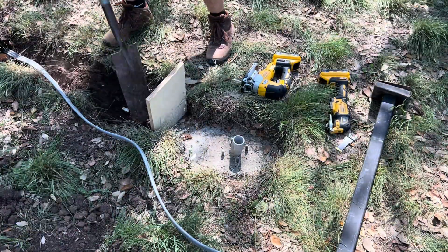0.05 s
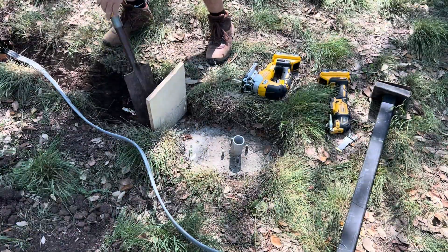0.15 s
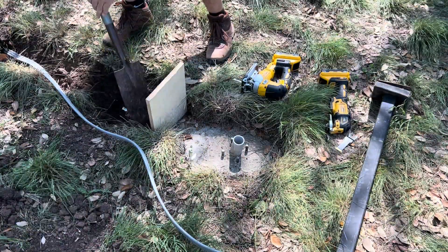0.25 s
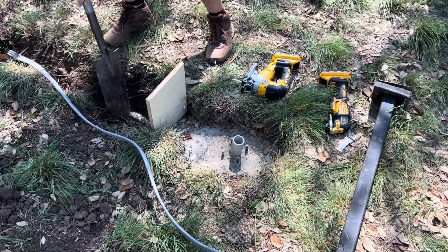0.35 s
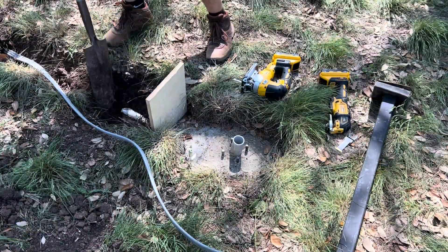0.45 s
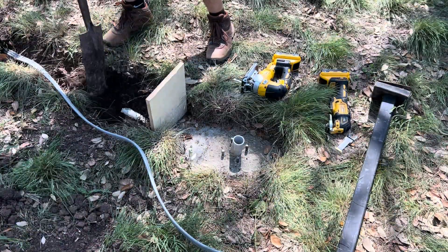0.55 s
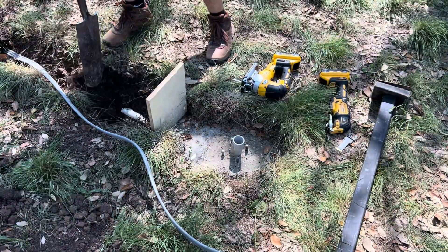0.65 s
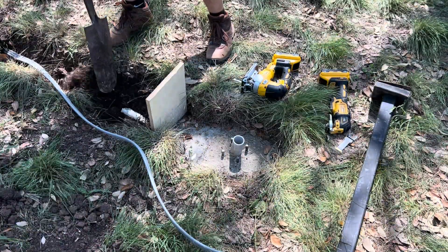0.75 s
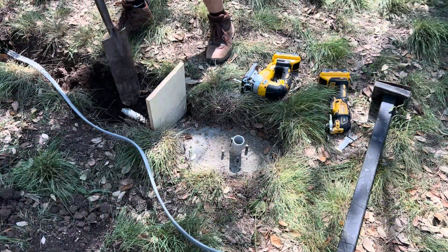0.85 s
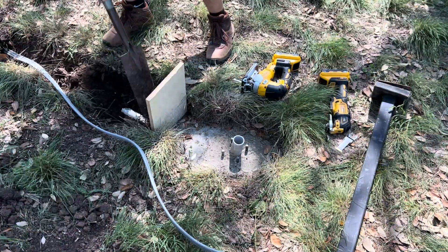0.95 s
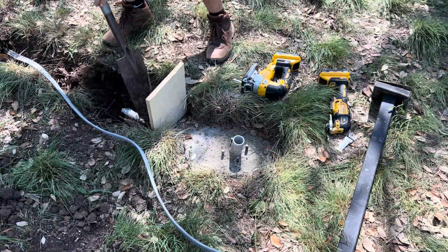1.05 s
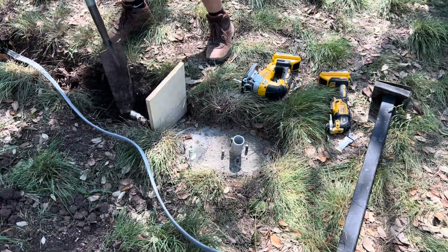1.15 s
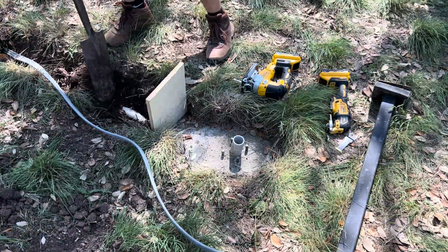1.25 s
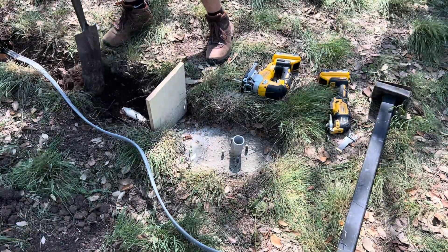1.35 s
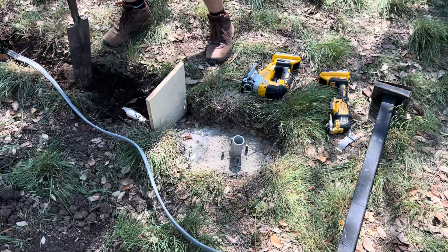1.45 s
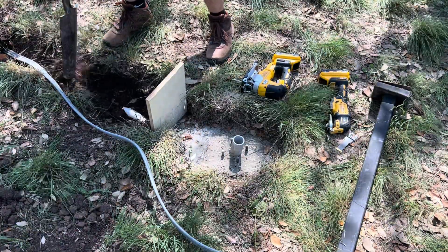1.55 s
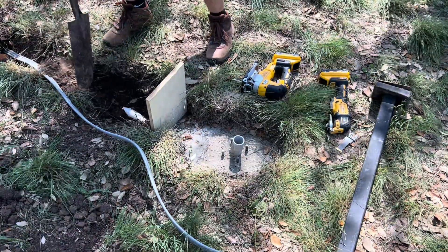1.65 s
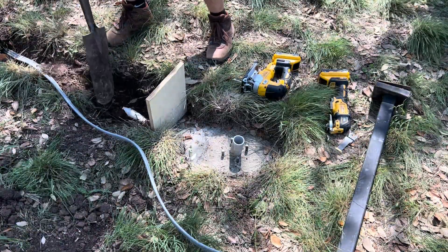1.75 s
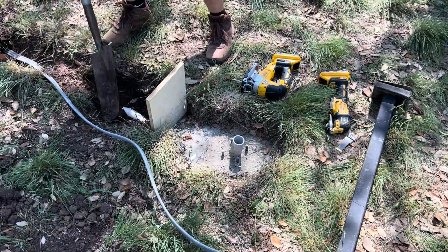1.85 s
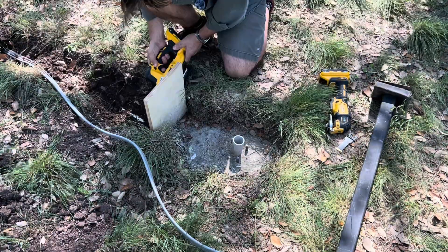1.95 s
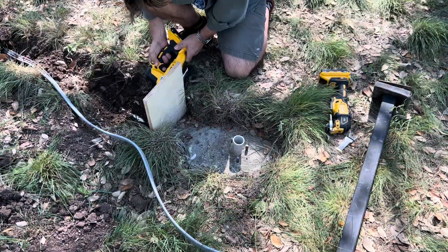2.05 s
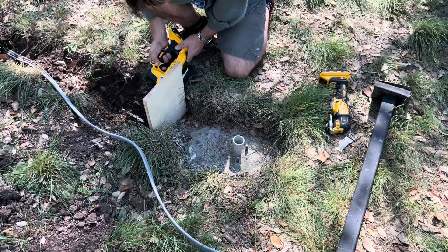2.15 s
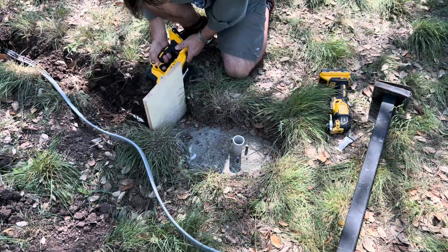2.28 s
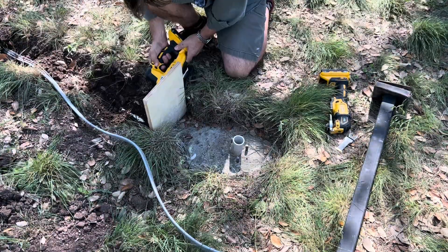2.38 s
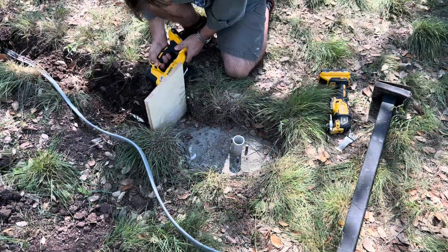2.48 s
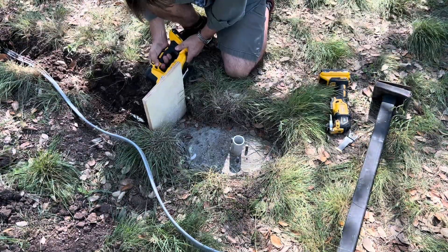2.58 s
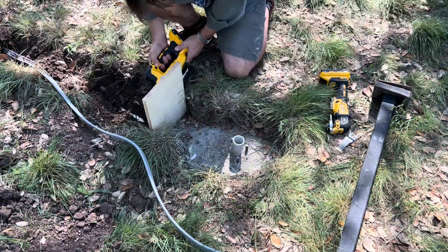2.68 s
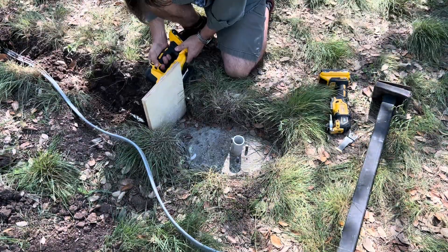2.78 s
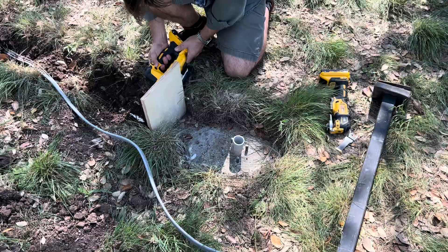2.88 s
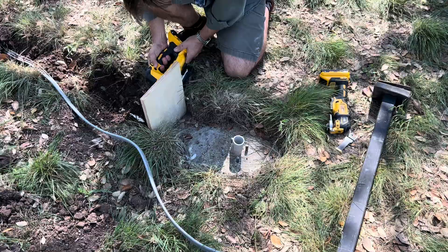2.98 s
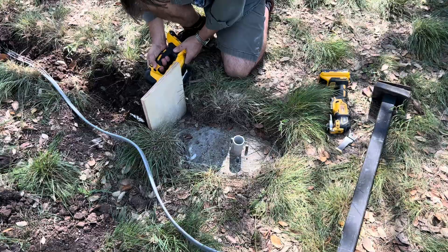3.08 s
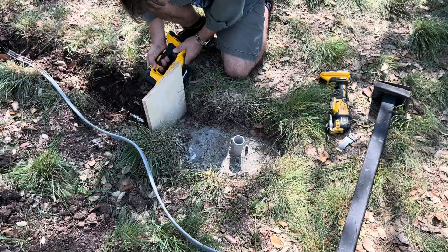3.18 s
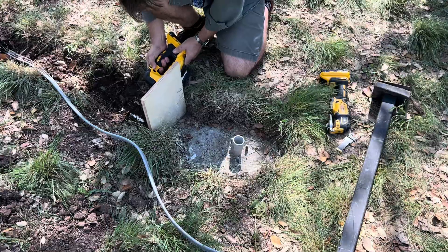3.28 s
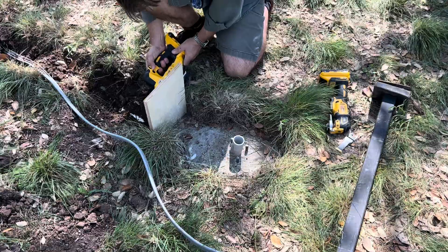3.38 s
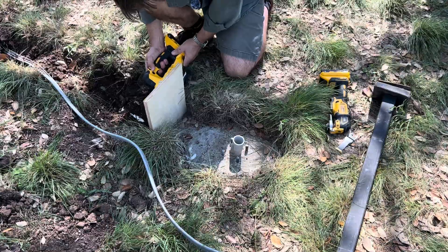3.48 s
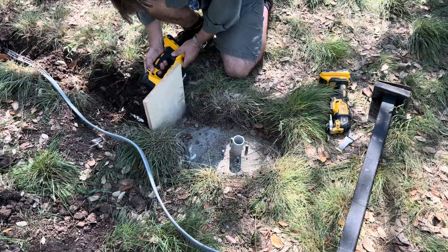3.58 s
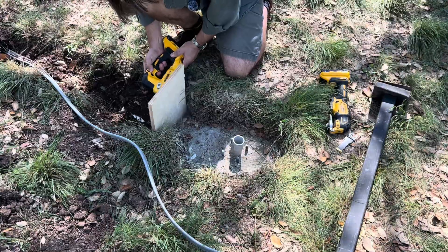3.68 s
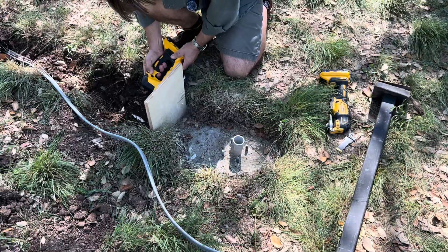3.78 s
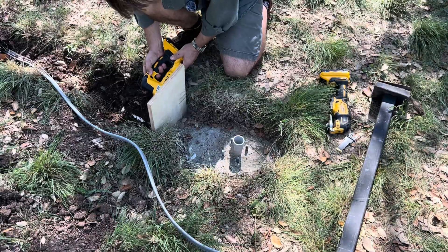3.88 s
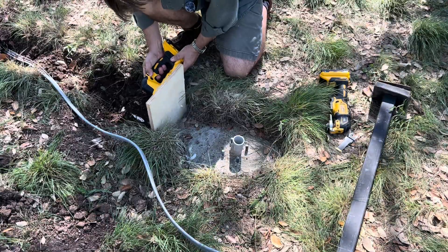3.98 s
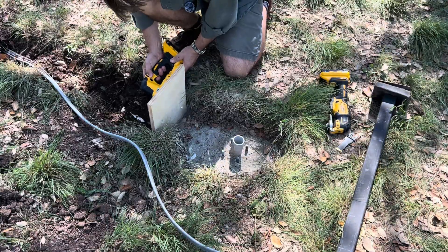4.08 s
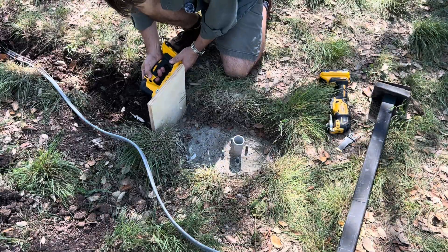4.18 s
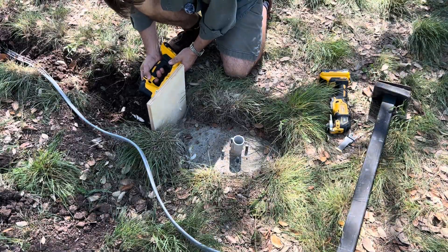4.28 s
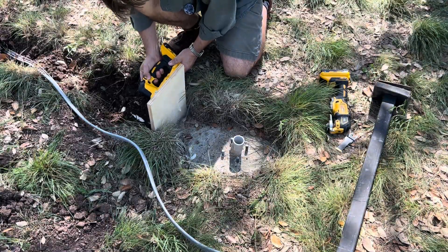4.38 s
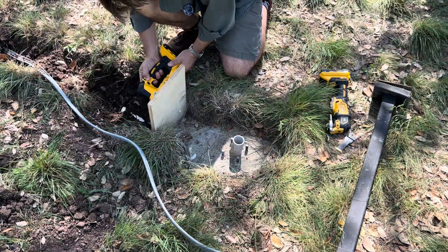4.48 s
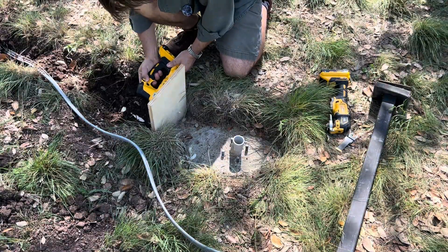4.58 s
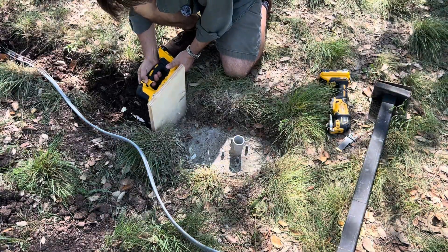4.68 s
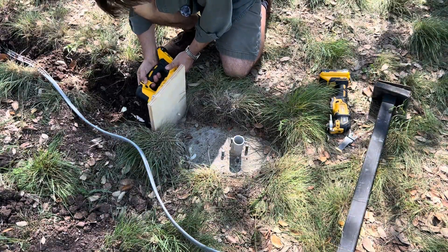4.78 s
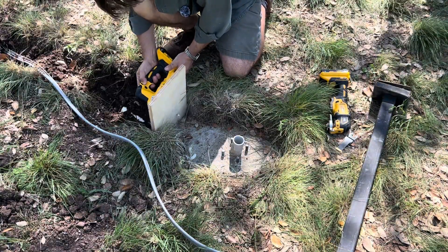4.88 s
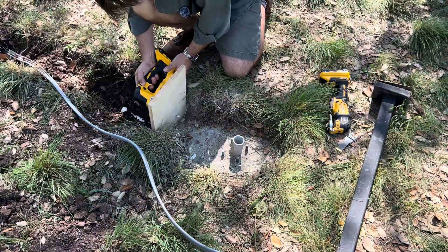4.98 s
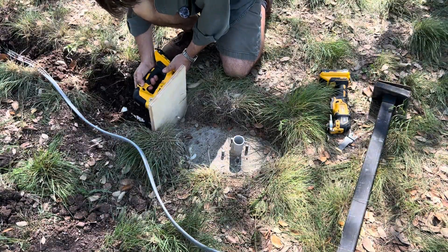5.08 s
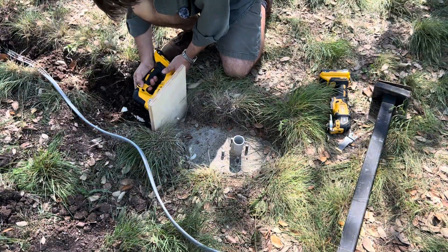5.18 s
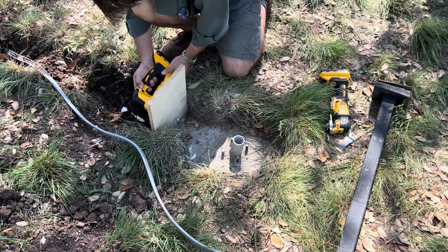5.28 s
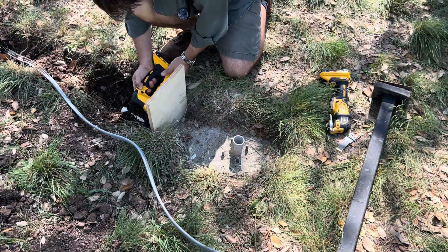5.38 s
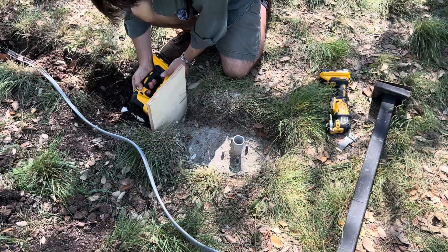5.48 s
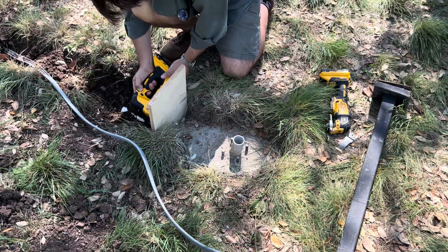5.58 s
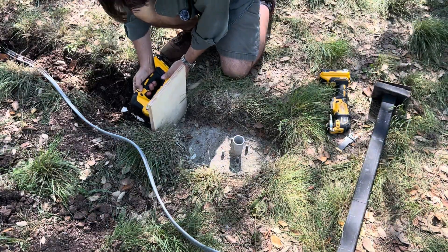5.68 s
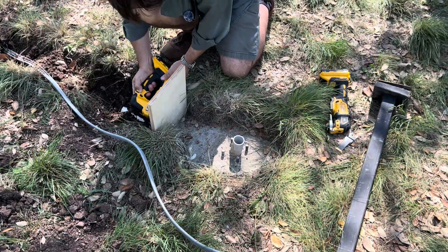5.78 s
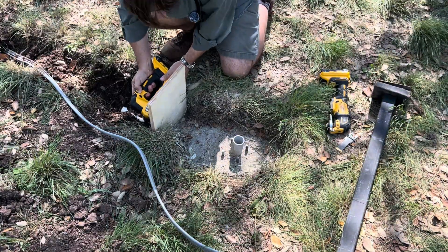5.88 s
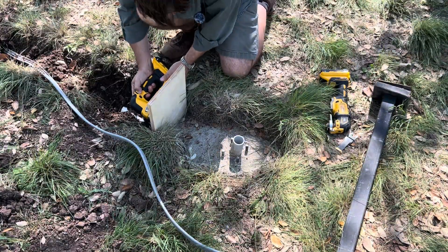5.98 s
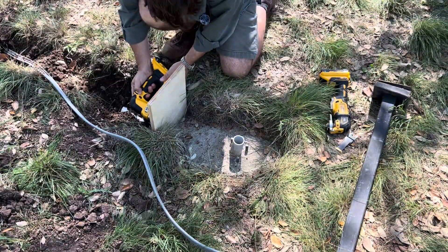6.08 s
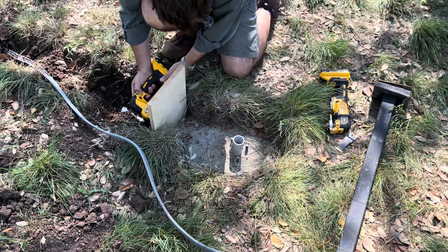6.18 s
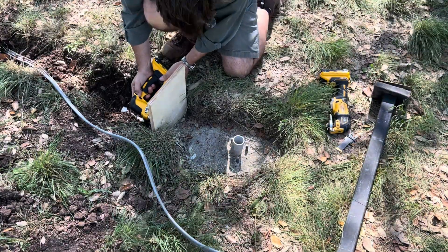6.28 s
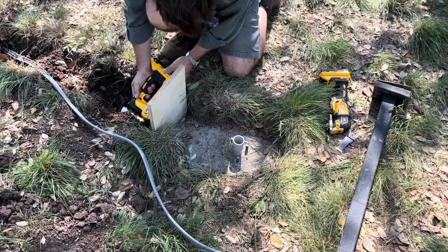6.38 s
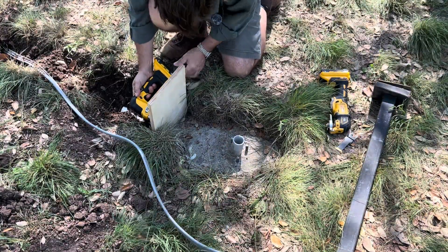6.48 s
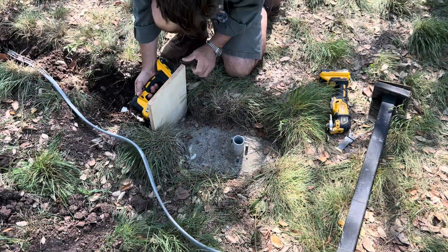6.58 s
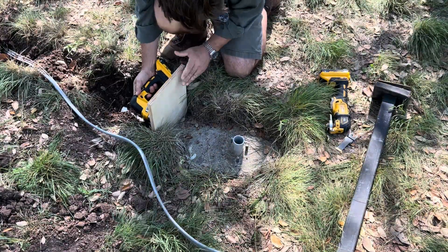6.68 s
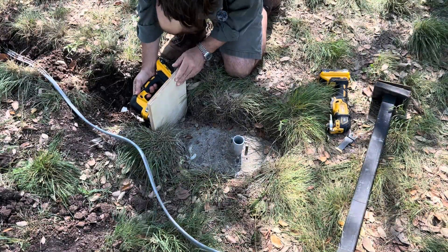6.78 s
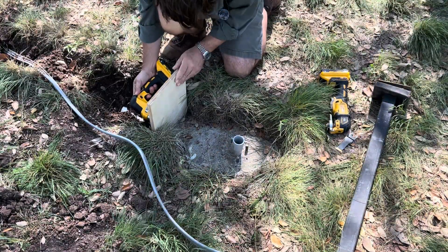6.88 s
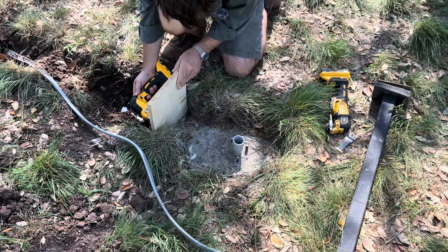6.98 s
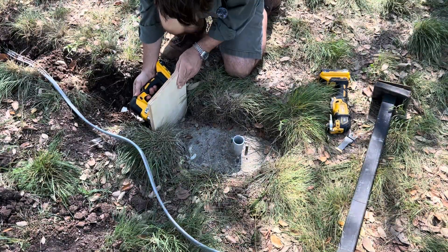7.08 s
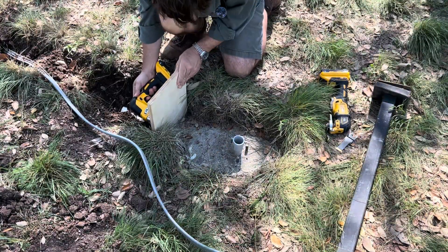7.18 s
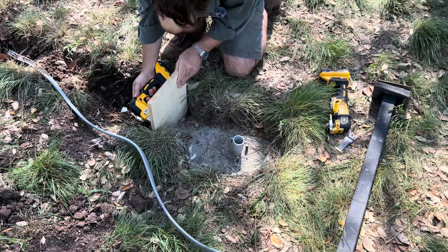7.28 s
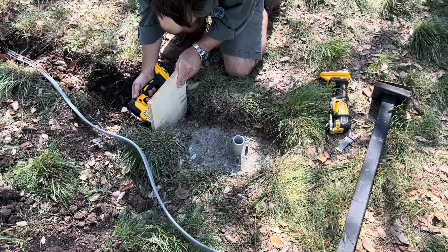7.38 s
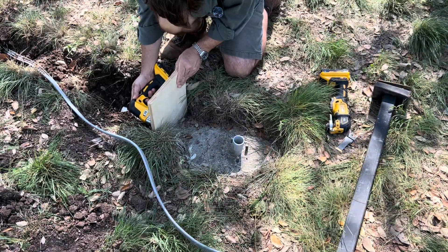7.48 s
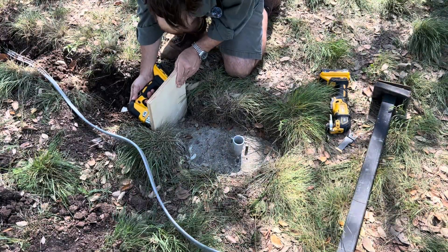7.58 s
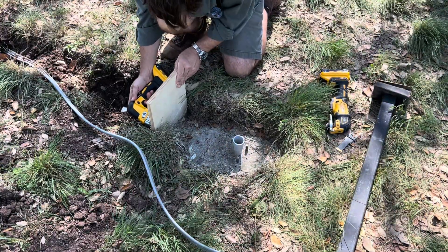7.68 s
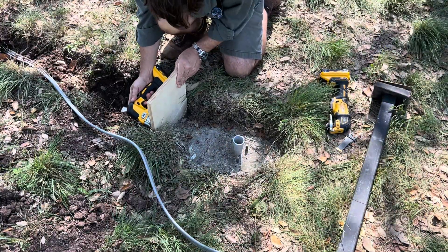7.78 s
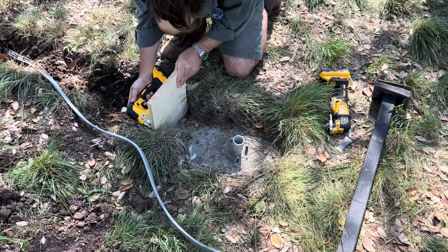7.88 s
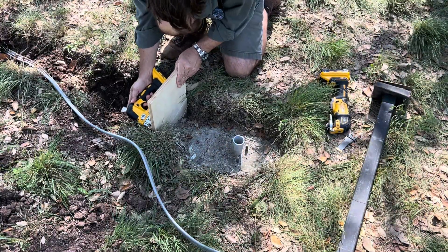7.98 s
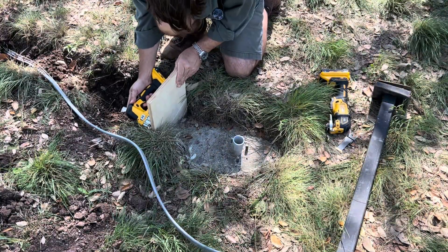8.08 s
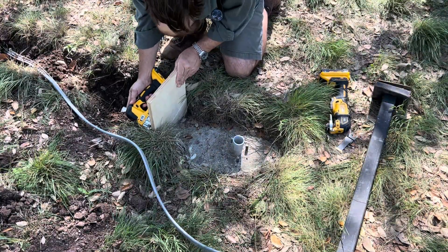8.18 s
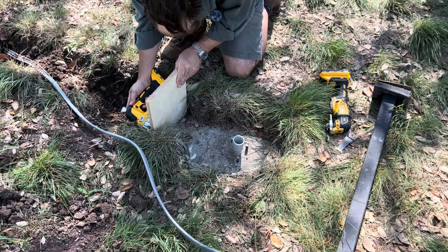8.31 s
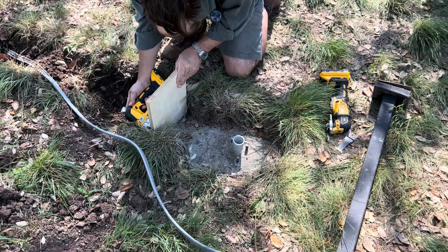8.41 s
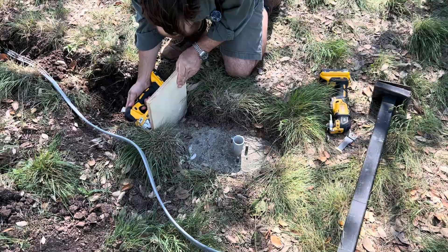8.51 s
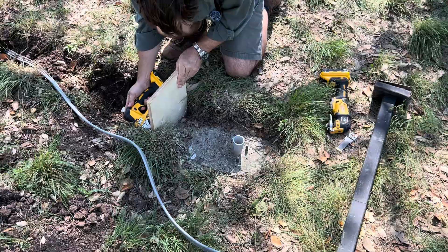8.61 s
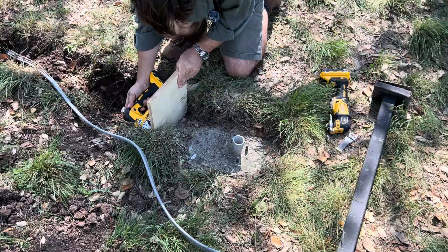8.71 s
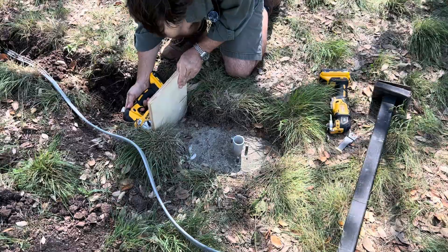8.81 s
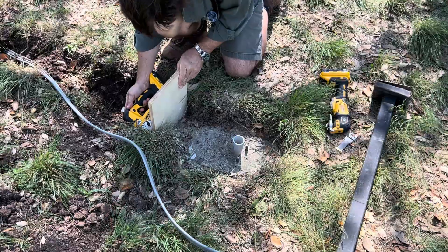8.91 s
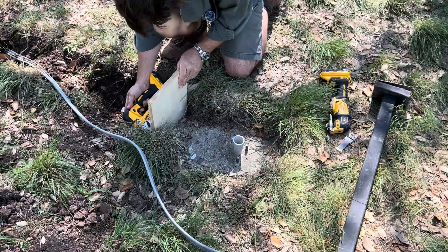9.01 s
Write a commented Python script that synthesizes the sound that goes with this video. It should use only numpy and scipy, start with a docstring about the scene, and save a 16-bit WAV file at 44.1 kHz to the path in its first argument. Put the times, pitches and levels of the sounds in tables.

```python
"""In still outdoor air, a spade scrapes soil out of a small hole; then a cordless saw cuts a plastic pipe in it.
Grit and stones excite the steel spade; soil drops with dull thuds.
About fifty strokes a second rasp the saw teeth through the wall and shake the pipe and the board beside it.
The motor whines on top. As the blade sinks, other resonances take over, the treble mostly dulls
and the strokes hammer harder in places; snags, chips, chirps and bucking groans break in."""
import sys
import numpy as np
from scipy import signal
from scipy.fft import rfft, irfft
from scipy.io import wavfile
from scipy.ndimage import uniform_filter1d

SR = 44100
rng = np.random.default_rng(int(sys.argv[2]) if len(sys.argv) > 2 else 0)


def transcribe(u):
    """Save the signal u as a 16-bit wav file named by the first command-line argument.

    u: samples, shape (n,) or (channels, n), limited to [-1, 1]; the rate is SR.
    q: integer samples, one column per channel.
    """
    v = np.clip(np.atleast_2d(u).T, -1, 1)
    q = np.round(v * 32767).astype(np.int16)
    wavfile.write(sys.argv[1], SR, q)


N = 399105
T = np.arange(N) / SR  # seconds
HZ = np.maximum(np.fft.rfftfreq(2 ** 19, 1 / SR), 1)  # frequencies used by the filters
DIG_END, SAW_ON = 1.965, 2.467  # seconds


def undb(db):
    """Turn decibels into gain."""
    return 10 ** (np.asarray(db) / 20)


def curves(table):
    """Join each column of a table by straight lines in time."""
    s, *columns = np.transpose(table)
    return [np.interp(T, s, c) for c in columns]


def by_depth(depth, table):
    """Read a two-column table at each moment's blade depth."""
    return np.interp(depth, *np.transpose(table))


def unit(x):
    """Scale to an average (rms) level of 1."""
    return x / np.sqrt(np.mean(x ** 2))


def steady(x):
    """Hold the rms level at 1 over each tenth of a second, a few strokes."""
    return x / np.sqrt(np.maximum(uniform_filter1d(x ** 2, size=4410), 1e-12))


def walk(rate):
    """Smooth random wandering, about rate new values a second, with a spread of roughly 1."""
    k = int(SR / rate)
    steps = np.repeat(rng.standard_normal(N // k + 1), k)
    return 1.5 * uniform_filter1d(steps, k)[:N]


def response(points, peaks=()):
    """Gain in dB over frequency: a broad colour plus bell-shaped resonances and hollows."""
    hz, db = np.transpose(points)
    colour = np.interp(np.log(HZ), np.log(hz), db)
    return colour + sum(g / (1 + ((HZ - f) / w) ** 2) ** 3 for f, w, g in peaks)


def ring(x, db):
    """Filter with the given gain, never ahead of time: resonances ring after each blow."""
    cepstrum = irfft(db * np.log(10) / 20)
    # folding the cepstrum forward makes the filter minimum-phase
    cepstrum[1:len(HZ) - 1] *= 2
    cepstrum[len(HZ):] = 0
    return irfft(rfft(x, len(cepstrum)) * np.exp(rfft(cepstrum)))[:N]


def band(x, lo_hz, hi_hz):
    """Steep band-pass."""
    sos = signal.butter(4, [lo_hz, min(hi_hz, .45 * SR)], "band", fs=SR, output="sos")
    return signal.sosfilt(sos, x)


def grains(spread_db):
    """Dense tiny clicks of very unequal size: noise whose level jumps every 16 samples."""
    sizes = np.minimum(rng.exponential(size=N // 16 + 1), 5)
    return unit(rng.standard_normal(N) * np.repeat(undb(spread_db * sizes), 16)[:N])


def blows(times, dbs, decay_s):
    """Sum of sudden rises that die away."""
    return sum(undb(db) * (T >= s) * np.exp(-abs(T - s) / decay_s) for s, db in zip(times, dbs))


def swell(s, db, rise, decay):
    """A level that swells to a peak and dies away."""
    return undb(db) * np.exp(-np.maximum((s - T) / rise, (T - s) / decay))


def burst(age, hz, length_s, glide=0):
    """A few cycles that swell and fade while their pitch glides."""
    envelope = np.exp(-np.minimum((age / length_s) ** 2, 99) / 2)
    return envelope * np.sin(2 * np.pi * hz * age * (1 + glide * age / 2))


def lobe(turn, at, width):
    """A smooth swell once a turn."""
    return np.exp((np.cos(2 * np.pi * (turn - at)) - 1) / (2 * np.pi * width) ** 2)


def slaps(turn, at, scatter_db):
    """One click each turn, when the crank passes the given point; their strength varies."""
    return np.diff(np.floor(turn - at), prepend=-1.) * undb(scatter_db * walk(60))


def clatter(turn, change_rate, size=900):
    """A rattle that repeats each turn of the crank and slowly changes its pattern."""
    age = T * change_rate
    patterns = rng.standard_normal((int(age[-1]) + 2, size))
    k = age.astype(int)
    place = (turn % 1 * size).astype(int)
    blend = age % 1 * np.pi / 2
    return patterns[k, place] * np.cos(blend) + patterns[k + 1, place] * np.sin(blend)


def mix(a, b, share):
    """Blend by power: the given share of a, the rest of b."""
    share = np.clip(share, 0, 1)
    return np.sqrt(share) * a + np.sqrt(1 - share) * b


# Colour of the still air. Each row: frequency in Hz, relative level in dB.
AIR_COLOUR = [(15, -35), (25, -7), (106, 0), (271, -5), (354, -8), (1500, -19), (2430, -20), (4260, -23),
              (6200, -19), (15000, -32)]
AIR_DB = -78


def still_air():
    """Faint outdoor background: steady noise, strongest in the bass."""
    return undb(AIR_DB) * unit(ring(rng.standard_normal(N), response(AIR_COLOUR)))


# Spade pushing through soil. Each row: peak time in seconds, level in dB before later trims,
# rise in seconds, decay in seconds.
SCRAPES = [(.2, -50, 0.029, 0.036), (.275, -50, .003, 0.15), (.43, -61.5, 0.034, 0.16),
           (1.03, -57.5, .02, .1), (1.16, -39, 0.023, 0.032), (1.23, -40, 0.011, 0.035),
           (1.38, -59, 0.083, 0.2), (1.85, -76, .008, .2)]
# When the spade touches soil. Each row: start in seconds, end in seconds.
IN_SOIL = [(.115, .74), (.99, 1.59), (1.82, 2.0)]


def scraping():
    """Each push of the spade swells and fades in small jerks, for as long as the blade touches soil."""
    touching = sum(np.clip(np.minimum((T - start) / .01, (end - T) / .08), 0, 1) for start, end in IN_SOIL)
    pushes = np.sqrt(sum(swell(*row) ** 2 for row in SCRAPES))
    return touching * pushes * undb(1.6 * walk(70.2))


# Soil drops and feet settling. Each row: peak time in seconds, level in dB before a 2 dB cut,
# rise in seconds, decay in seconds.
THUDS = [(0, -63, .01, .06), (.21, -59, .03, 0.17), (.445, -52, 0.014, 0.027), (.55, -65, .1, 0.14),
         (0.904, -42.5, 0.025, 0.066), (1.16, -51, 0.023, .025), (1.232, -51, .008, 0.072),
         (1.505, -50, 0.0087, 0.1), (1.675, -43, .004, .03), (1.745, -42, .02, .04),
         (1.86, -54, .02, 0.076)]
# Spade strikes and small knocks. Each row: time in seconds, level in dB before later trims,
# thump level in dB against the clink, also before trims.
STRIKES = [(0.134, -50, -25), (0.189, -48, -25), (0.267, -38, -34), (0.419, -44, -19), (0.444, -48, -1),
           (1.107, -42, -23), (1.153, -30, -6), (1.161, -30.5, 5.5), (1.177, -28, -27), (1.219, -32, -17),
           (1.234, -39, 1.5), (1.374, -51, -29), (1.573, -62, -10), (1.635, -64, -8), (1.957, -58, 2),
           (2.099, -64, -25), (2.222, -66, -20), (2.29, -70, -39), (2.355, -75, -22), (2.396, -61, -15)]
# Resonances of the spade blade. Each row: frequency in Hz, width in Hz, boost in dB.
SPADE = [(338, 67, 11.5), (734, 47, 11.5), (934, 140, 9), (1170, 210, 5.5), (1420, 63, 8), (1660, 76, 12),
         (2450, 110, 14), (3080, 310, 10), (4970, 110, 11), (5790, 120, 10), (6700, 130, 9)]
# Colours of grit, soil and thump. Each row: frequency in Hz, relative level in dB.
GRIT = [(300, -12), (700, -2.5), (1500, -1), (2300, -10.5), (4000, -4), (7000, -1.5), (10000, -9.5),
        (13000, -21), (15500, -31)]
SOIL = [(25, -3), (60, 6), (140, 0.5), (250, -8), (500, -21.5), (1000, -44), (4000, -70.5)]
THUMP = [(50, -29), (200, -2), (320, -8), (600, -5.5), (1200, -25), (4000, -49)]


def spade():
    """Grit scrapes and strikes the steel blade, which rings; soil drops with dull thuds."""
    s, db, thump_db = np.transpose(STRIKES)
    steel = response(GRIT, SPADE)
    scrape = unit(ring(grains(3.3), steel)) * scraping() * undb(-4.5)
    thud_level = np.sqrt(sum(swell(*row) ** 2 for row in THUDS)) * undb(-2.0)
    thuds = steady(ring(rng.standard_normal(N), response(SOIL))) * thud_level
    clink = unit(ring(grains(2), steel)) * blows(s, db - 7, decay_s=.007)
    thump_noise = steady(ring(rng.standard_normal(N), response(THUMP, SPADE)))
    thump = thump_noise * blows(s, db + thump_db - 3.0, decay_s=0.013)
    return (scrape + thuds) * np.clip((DIG_END - T) / .004, 0, 1) + clink + thump


# Stones squeaking along the steel. Each row: time in seconds, pitch in Hz, level in dB, length in seconds.
SQUEAKS = [(0.196, 1330, -63, 0.01), (0.423, 1230, -56, .012), (1.144, 785, -53, .015),
           (1.318, 1130, -62, 0.0089), (1.376, 1230, -53.5, 0.004), (1.855, 1390, -70, .014),
           (1.882, 950, -71, 0.029), (1.927, 1980, -76, .018), (1.957, 1930, -64, .005)]


def stones():
    """Stones squeak on the spade in wavering tones; small pebbles each ping it at a pitch of their own."""
    out = np.zeros(N)
    for s, hz, db, length in SQUEAKS:
        envelope = np.exp(-((T - s) / length) ** 2 / 2)
        phase = 2 * np.pi * np.cumsum(hz * (1 + 0.032 * walk(300))) / SR
        out += np.sqrt(2) * undb(db) * envelope * np.sin(phase)
    push = scraping()
    t = T[:2000]
    for when, pitch, size in rng.random(size=(600, 3)):
        i = int(when * (DIG_END - t[-1]) * SR)
        hz = 900 * 9 ** pitch  # 900 to 8100 Hz
        ping = np.exp(-t / 0.0078) * np.sin(2 * np.pi * hz * t)
        out[i:i + len(t)] += push[i] * undb(-14 + 7.5 * size ** 2) * ping
    return out


# The rustle. One row: peak time in seconds, level in dB, rise in seconds, decay in seconds.
RUSTLE = (2.103, -72, .004, .035)


def handling():
    """A short rustle of grainy treble noise as the saw is set against the pipe."""
    return unit(band(grains(3), 4000, 12000)) * swell(*RUSTLE)


# Extra share of sharp thumps as the shoe pounds the board. Each row: blade depth, share from 0 to 1.
POUNDING = [(4, 0), (5.5, .3), (6.3, .1), (8, 0)]


def shaking(turn, repeat, hammer, depth):
    """The moving mass shakes pipe and board at multiples of the stroke rate; loose contact adds rumble."""
    lines = np.zeros(N)
    for k in np.arange(2, 14):
        drift = rng.uniform(0, 2 * np.pi) + 0.057 * k * walk(9.2)
        lines += undb(2.74 * walk(4)) * np.cos(2 * np.pi * k * (turn - .6) + drift)
    thumps = band(slaps(turn, 0.4975, scatter_db=1), 72, 470)
    thump_share = 0.12 + 0.19 * hammer + by_depth(depth, POUNDING)
    regular = mix(unit(thumps), unit(lines), thump_share)
    rumble = band(rng.standard_normal(N), 44, 716)
    return mix(regular, unit(rumble), repeat) * (1 + 0.31 * lobe(turn, 0.67, 0.13))


def teeth(turn, hammer, repeat, bounce_db):
    """Teeth tear plastic on the pull, more lightly on the return; the pipe bounces and slaps the shoe."""
    pull, back = lobe(turn, .34, .11), lobe(turn, .87, .065)
    bounce = np.sin(2 * np.pi * np.cumsum(21 + 1.77 * walk(8.8)) / SR)
    every_other = -np.cos(np.pi * (turn - .3))
    # under hard hammering the bounce locks to every second stroke
    bounce = mix(0.64 * every_other, bounce, (hammer - .45) / 0.15)
    force = undb(bounce_db * (.8 * bounce + .35 * (1 - hammer) * walk(50)))
    hammer = np.clip(hammer, 0, 1)

    knock_swing = 0.58 + (0.2 + 0.23 * hammer) * (pull + 0.39 * back)
    knock = mix(clatter(turn, 2.433), grains(1.76), 0.19 * repeat) * knock_swing
    shoe = unit(slaps(turn + .006 * walk(40), .26, scatter_db=2.5))
    knock = steady(knock) + .6 * hammer ** 2 * shoe

    rasp_swing = 1 - 0.58 * hammer + hammer * (1.6 * pull + 0.54 * back)
    rasp = mix(clatter(turn, 3.5), grains(2.3), 0.15 * repeat) * rasp_swing
    # the blade taps the pipe wall twice a turn
    taps = band(slaps(turn, .4, scatter_db=3.5) + slaps(turn, .84, scatter_db=3.5), 1900, 2600)
    return knock * force, (steady(rasp) + 0.38 * hammer * unit(taps)) * force ** .5


LOCK_S = 7.0  # seconds; from here hammering makes the judder earlier and every second pull weak
WEAK_PULL_DB = -7.5  # at full lock


def judder(turn, hammer):
    """On each pull the uncut wall sticks and slips in a short judder of falling pitch."""
    locked = np.clip(hammer / .5, 0, 1) * (T > LOCK_S)
    turn = turn + 0.129 * locked
    cycles = np.interp(T, [2.7, 3.15, 7], [18.8, 17.6, 18.5])  # slips per stroke, mid-judder
    since = (turn + .14) % 1 - .5
    slip = 2 * np.pi * (cycles * since - 4 * since ** 2) + .8 * walk(40)
    weak = (1 + np.cos(np.pi * (turn - .36))) / 2
    level = undb(2 * walk(35) + WEAK_PULL_DB * locked * weak)
    return steady(lobe(turn, .36, .115) * np.sin(slip) * level)


FLICKER_DB = 1.8  # rough spread of each band's wander


def flicker(x):
    """Narrow bands of the rasp swell and fade, each on its own."""
    edges = np.geomspace(1200, 7000, 11)
    out = x.copy()
    for lo, hi in zip(edges, edges[1:]):
        part = signal.sosfiltfilt(signal.butter(2, [lo, hi], "band", fs=SR, output="sos"), x)
        out += (undb(FLICKER_DB * walk(14)) - 1) * part
    return out


BACKLASH_DB = -5.5  # against the rasp, while the clicks are at their strongest


def backlash(turn):
    """The drive clicks twice a stroke, most while the blade is still shallow."""
    shallow = np.interp(T, [2.7, 3.1, 4.4, 5.2, 6.5], [.3, 1, 1, .7, .2])
    late = turn + .02 * walk(2)
    clicks = slaps(late, .58, scatter_db=2) + slaps(late, .15, scatter_db=2)
    tails = signal.lfilter([1], [1, -np.exp(-1 / (0.00047 * SR))], clicks)
    return undb(BACKLASH_DB) * shallow * unit(tails * rng.standard_normal(N))


# The blade snags and kicks the pipe. Each row: time in seconds, level in dB before later trims, ring in Hz.
SNAGS = [(2.471, -32, 990), (2.493, -32, 890), (2.537, -27, 900), (5.519, -13, 980), (5.598, -12, 860),
         (5.657, -13, 1160), (5.696, -13, 1080), (5.757, -14, 930), (5.813, -13, 1080), (5.833, -15, 1100),
         (5.892, -11, 1060), (5.933, -16, 1080), (5.991, -14, 1120), (6.033, -15, 1090), (7.114, -15, 1110),
         (7.155, -15, 1080), (7.44, -13, 1000), (7.481, -13, 1030), (7.522, -14, 1000), (7.563, -14, 1030),
         (7.684, -14, 1000), (7.764, -16, 1000), (7.784, -15, 1000), (8.022, -14, 956), (8.062, -15, 958),
         (8.082, -14, 960), (8.102, -14, 947), (8.182, -15, 990), (8.262, -14, 977), (8.344, -13, 977),
         (8.385, -14, 977), (8.466, -14, 960), (8.666, -14, 985), (8.768, -15, 1000), (8.887, -14, 940),
         (8.927, -14, 947), (8.987, -17, 935)]
# How hard the saw shakes pipe and board. Each row: time in seconds, level in dB.
SHAKE = [(2.49, -35), (2.6, -31.5), (3.17, -20.5), (3.7, -20.3), (4.25, -19.5), (4.7, -17.5), (5.42, -17),
         (5.72, -24), (5.86, -29), (6.4, -43), (6.67, -44), (6.74, -26.5), (7.1, -27.5), (7.45, -18.7),
         (7.75, -19.5), (8.22, -25), (8.52, -19), (8.73, -22), (8.94, -35), (9.02, -29.5)]
# Treble level before contact and spin-up. Each row: time in seconds, level in dB.
HISS = [(2.65, -28.5), (3.15, -26.5), (5.75, -26.5), (6.36, -32.5), (6.52, -27.5), (6.7, -34.5),
        (7.05, -35), (7.4, -37), (7.95, -40), (8.25, -36), (8.5, -34), (8.72, -30), (8.88, -42.5),
        (9.05, -38)]
# Loudness before contact, stalls and spin-up. Each row: blade depth, pipe ring in dB, rasp in dB.
LOUDNESS = [(0, -21, -23.3), (1, -23, -23), (2, -22, -23.3), (3, -23.5, -23.5), (4, -25, -20),
            (5, -24.5, -23.5), (6, -24, -25), (7, -23.8, -24.5), (8, -23.8, -24.5)]
# The blade bites (+) or eases off (-) for a moment. Each row: time in seconds, half length in seconds,
# change of the pipe ring in dB.
CONTACTS = [(2.644, 0.021, -1), (2.708, 0.035, -3.5), (3.46, 0.02, -3), (3.766, 0.32, -3.5),
            (4.65, 0.13, 2.5), (5.64, 0.1, 2.5), (5.873, 0.016, -10), (6.415, 0.06, -13), (6.52, .035, 1),
            (6.605, 0.051, -12.5), (6.784, 0.027, 3), (6.877, 0.019, -8), (6.934, 0.072, 4),
            (7.1, 0.037, 5.5), (8.194, 0.092, -3.5), (8.963, 0.026, -6), (9.02, 0.034, 2.5)]
RASP_FOLLOWS, HISS_FOLLOWS = 0.38, 0.28  # share of a contact change that reaches rasp and hiss
ROCK_HZ, ROCK_DB = 9.5, 1  # the pipe rocks against the blade, around this rate
# ring, and rasp with hiss, start this far down and rise with the motor
SPIN_UP_S, SPIN_UP_RING_DB, SPIN_UP_RASP_DB = 0.15, -29, -18
STALL_S, STALL_DB = .007, -8  # the other ringing drops while the blade is caught


def cut_levels(depth):
    """Levels in dB of shaking, ring, rasp and hiss; the last three rise at the start and follow contact."""
    (shake_db,), (hiss_db,) = curves(SHAKE), curves(HISS)
    depths, ring_db, rasp_db = np.transpose(LOUDNESS)
    starting = np.clip(1 - (T - SAW_ON) / SPIN_UP_S, 0, 1)
    rocking = ROCK_DB * np.sin(2 * np.pi * np.cumsum(ROCK_HZ * (1 + 0.2397 * walk(6))) / SR)
    contact = rocking + sum(db * np.exp(-((T - s) / length) ** 2) for s, length, db in CONTACTS)
    stall = STALL_DB * sum(np.exp(-((T - s) / STALL_S) ** 2) for s, _, _ in SNAGS)
    return (shake_db,
            np.interp(depth, depths, ring_db) + contact + stall + SPIN_UP_RING_DB * starting,
            np.interp(depth, depths, rasp_db) + RASP_FOLLOWS * contact + SPIN_UP_RASP_DB * starting,
            hiss_db + HISS_FOLLOWS * contact + SPIN_UP_RASP_DB * starting)


# Motor speed. Each row: time in seconds, strokes a second.
SPEED = [(2.46, 28.59), (2.6, 50.29), (2.9, 49.23), (3.25, 49.01), (3.45, 50.0), (3.56, 47.89),
         (3.72, 50.57), (4.0, 50.07), (4.2, 49.84), (4.45, 49.45), (4.9, 50.22), (5.1, 48.58), (5.3, 49.95),
         (5.5, 50.28), (5.8, 51.04), (6.25, 49.74), (6.6, 51.03), (6.88, 47.76), (7.02, 50.54),
         (7.44, 48.23), (7.86, 50.62), (8.42, 49.04), (8.7, 50.29), (9.05, 49.13)]
# How the blade sits. Each row: time in seconds, hammering from 0 to 1, share of the shaking that repeats
# from 0 to 1, pipe bounce in dB.
GRIP = [(2.5, 0, 0.27, 4), (2.9, 0, 0.86, 2), (3.5, 0.52, 0.29, 3), (4.3, 0.1, 0.32, 2),
        (5.2, 0.2, 0.14, 2.5), (5.9, 0.02, 0.29, 3.5), (6.5, 0.27, 0.73, -1), (7, 0.3, 0.5, 2.5),
        (7.6, 0.56, 0.87, 0.5), (8.5, 0.54, 0.74, 3), (9, 0.5, 0.32, 3)]
# How deep the blade is. Each row: time in seconds, depth from 0 (entering) to 8 (clear of the wall).
DEPTH = [(3.2, 0), (3.8, 1), (4.7, 1.1), (5.3, 2), (5.65, 2.15), (5.95, 2.85), (6.24, 3.05), (6.44, 4),
         (6.62, 4), (6.72, 5), (7.15, 5), (7.45, 6), (7.9, 6.1), (8.4, 7), (8.74, 7.05), (8.85, 8)]
# How much of the pipe ring is stick-slip judder. Each row: blade depth, share from 0 to 1.
JUDDER_SHARE = [(0, .33), (1, .02), (5, .04), (6, .16), (7, .22), (8, .25)]
# Colour of the cut. Each row: frequency in Hz, relative level in dB.
CUT_COLOUR = [(30, -57), (80, -10), (160, -1), (250, 6), (400, 2.5), (500, 0.5), (620, -9.5), (850, -3.5),
              (1400, -8.5), (2300, -4.5), (5200, -18.5), (7000, -22), (10000, -27.5), (15500, -45.5)]
# Resonances and hollows of pipe, board and hole, one table for each depth from 0 to 8.
# Each row: frequency in Hz, width in Hz, boost or cut in dB.
ENTERING = [(148.5, 14, 13), (316, 200, 6.5), (392, 18, -8.5), (435, 73, 4.5), (872, 38, 12),
            (970, 130, 6.5), (710, 180, 10), (1220, 220, 7.5), (3040, 220, 5), (4060, 180, -4),
            (4800, 1900, 2.5), (6640, 300, -3.5), (7260, 400, 0), (9200, 300, 3), (11100, 500, -3),
            (12700, 400, 0)]
BITING = [(60, 130, -7), (340, 170, 4), (640, 130, 8.5), (858, 36, 11), (1124, 270, 7), (1750, 460, -2.5),
          (9600, 290, 5.5)]
MID_WALL = [(134, 330, -7.5), (350, 220, 4), (852, 127, 9.5), (1078, 286, 18.5), (1738, 190, 9.5),
            (2150, 430, -5.5), (3100, 400, 8), (3700, 370, 4.5)]
THROUGH_WALL = [(116, 100, -10), (190, 120, 10), (650, 120, -2), (830, 210, 13.5), (1096, 125, 14),
                (1410, 240, -20), (1970, 380, 3), (2410, 290, -12.5), (3680, 310, 9.5)]
BREAKING = [(110, 91, -9), (257, 66, -3), (380, 90, -7), (580, 130, -20), (800, 96, 14), (1040, 220, 5),
            (1380, 310, -16.5), (1590, 90, 4), (1740, 120, -5), (2090, 150, 11), (2610, 170, -10),
            (3020, 230, 3.5), (3700, 400, 4.5), (4900, 500, 3), (5600, 600, 3.5), (7100, 300, 4),
            (11700, 770, -8)]
CHATTERING = [(135, 40, -9), (380, 69, -2), (440, 78, 4), (770, 75, 8.5), (1046, 240, 9), (1315, 120, 3),
              (1800, 150, -2.5), (2100, 240, 9), (2390, 170, 6.5), (2930, 670, -0.5), (3640, 290, 7.5),
              (4310, 280, 8.5), (4700, 220, 8.5), (5250, 260, 10), (5800, 500, 5), (7030, 680, 7),
              (8900, 500, 0.5), (11100, 2800, -13), (12200, 300, 8)]
DEEP = [(135, 59, 5), (260, 88, -2), (425, 83, 8), (730, 125, 16.5), (1090, 150, 8), (1260, 91, -5),
        (1510, 130, 4.5), (1810, 300, -4), (2140, 320, 10.5), (3000, 430, -5.5), (3640, 340, 9.5),
        (4310, 490, 10), (5450, 800, 10), (6360, 400, 5), (7500, 400, 3), (9250, 320, 5), (10900, 3600, -7),
        (12600, 400, 5)]
BOTTOM = [(146, 65, 12), (296, 36, -13), (350, 56, 4.5), (404, 38, -4.5), (494, 51, 2), (710, 170, 15.5),
          (995, 50, 8.5), (1265, 116, -17), (1580, 270, 9.5), (2140, 78, -17), (2390, 99, 3.5),
          (2700, 200, -4), (3400, 360, -3.5), (3860, 480, 8.5), (4730, 810, 7.5), (5750, 400, 2),
          (6350, 370, 7.5), (8300, 600, 1), (9250, 400, -9), (10600, 5400, -9.5)]
CLEAR = [(144, 58, 5), (294, 52, -12), (353, 56, 2), (556, 60, -2), (715, 150, 14.5), (960, 51, 6),
         (1270, 150, -14), (1580, 240, 10.5), (2110, 79, -12), (2350, 140, 4), (2820, 200, -6),
         (3240, 160, 3), (3500, 200, -11), (3930, 450, 9), (4720, 440, 6.5), (5830, 420, -13),
         (6250, 300, 3), (9700, 900, 5), (10900, 4400, -8)]
BY_DEPTH = [ENTERING, BITING, MID_WALL, THROUGH_WALL, BREAKING, CHATTERING, DEEP, BOTTOM, CLEAR]
WHINE_START_S = 2.585


def saw():
    """Strokes excite pipe, board and hole, whose resonances change as the blade sinks."""
    speed, = curves(SPEED)
    hammer, repeat, bounce_db = curves(GRIP)
    depth, = curves(DEPTH)
    levels_db = cut_levels(depth)
    turn = np.cumsum(speed * (T > 2.46)) / SR  # strokes so far

    knock, rasp = teeth(turn, hammer, repeat, bounce_db)
    judder_in = np.clip((T - WHINE_START_S + .03) / .08, 0, 1)
    knock = mix(judder(turn, hammer), steady(knock), by_depth(depth, JUDDER_SHARE) * judder_in)
    drive = 0.27 * steady(shaking(turn, repeat, hammer, depth))
    drive += band(steady(knock), 620, 1497)
    drive += band(flicker(steady(rasp)) + backlash(turn), 1105, 20000)

    # crossfade between the resonances of neighbouring depths
    sound = sum(np.maximum(1 - abs(depth - k), 0) * ring(drive, response(CUT_COLOUR, peaks))
                for k, peaks in enumerate(BY_DEPTH))
    # shaking, pipe ring, rasp and hiss each get a band and a level
    edges = [60, 620, 1400, 5000, 17000]
    cut = sum(undb(db) * steady(band(sound, lo, hi)) for db, lo, hi in zip(levels_db, edges, edges[1:]))
    # the whole tool swings with the blade
    sway = undb(-51.5 + 31.0 * hammer + 0.4 * levels_db[0]) * np.sin(2 * np.pi * turn)
    switched_on = np.clip((T - SAW_ON) / 0.0021, 0, 1)
    return (cut + sway + bucking(turn) + whine(turn, speed)) * switched_on


SNAG_S, SNAG_DECAY_S, SNAG_CRACK_DB = .0026, .0039, -5.5  # knock half length, crack decay, crack trim


def snags():
    """A tooth catches and kicks the pipe: a short falling knock with a crack of ringing noise."""
    s, db, _ = np.transpose(SNAGS)
    knocks = sum(undb(level + 2) * burst(T - at, hz, SNAG_S, glide=-12) for at, level, hz in SNAGS)
    pipe = unit(band(ring(rng.standard_normal(N), response(CUT_COLOUR, BOTTOM)), 1100, 6500))
    crack_level = blows(s - SNAG_S, db + SNAG_CRACK_DB, decay_s=SNAG_DECAY_S)
    return knocks + band(pipe * crack_level, 600, 6500)


# Level of the motor whine before a 4 dB lift. Each row: time in seconds, level in dB.
WHINE = [(2.6, -35), (3.5, -35.5), (5.4, -37), (5.9, -37), (6.65, -46), (6.9, -54), (9, -60)]
WHINE_ORDER = 120.3  # whine cycles per stroke
WHINE_OVERSHOOT_HZ, WHINE_SETTLE_S = 240, .12  # the motor starts low, overshoots once, then settles


def whine(turn, speed):
    """The motor's tone follows its speed, wavers twice a stroke and roughens once the teeth bite."""
    db, = curves(WHINE)
    age = (T - WHINE_START_S) / WHINE_SETTLE_S
    overshoot = -WHINE_OVERSHOOT_HZ * np.cos(np.pi * age) * np.exp(-(age / 1.4) ** 4)
    rough = np.interp(T, [2.8, 4.2], [.6, 1.3])
    roughness = rough * (75 * walk(350) + 20 * walk(20))
    hz = WHINE_ORDER * speed + overshoot + 55 * np.sin(4 * np.pi * turn) + roughness
    level = np.sqrt(2) * undb(db + 4.0 + 0.7 * walk(120)) * np.clip(age / 0.22, 0, 1)
    return level * np.sin(2 * np.pi * np.cumsum(hz) / SR)


# Chips snapping off the cut. Each row: time in seconds, level in dB.
CHIPS = [(3.243, -16), (3.2835, -16), (3.325, -15), (3.670, -20), (3.914, -20), (5.305, -18), (8.547, -28)]
# Colour of a snapping chip. Each row: frequency in Hz, relative level in dB.
CHIP_COLOUR = [(500, -20), (2000, -6), (5000, 0), (9000, -1), (15000, -14)]


def chips():
    """Chips snap off the cut: very short bursts of bright noise."""
    noise = unit(ring(rng.standard_normal(N), response(CHIP_COLOUR)))
    return noise * blows(*np.transpose(CHIPS), decay_s=0.0014)


# Spells in which the pipe bucks against the board. Each row: first time in seconds, last time in seconds,
# strokes between bucks, middle pitch in Hz, middle level in dB.
BUCKING = [(3.567, 3.95, 2, 330, -9.5), (3.971, 4.14, 1, 360, -13), (4.144, 4.55, 1.5, 335, -10),
           (4.204, 4.52, 3, 650, -13.5), (4.6, 5.15, 1, 440, -16), (5.17, 5.5, 1, 340, -19),
           (7.645, 7.95, 1, 350, -13)]
# half length in seconds, relative rise of pitch per second, unevenness in dB
BUCK_S, BUCK_GLIDE_PER_S, BUCK_SCATTER_DB = .0035, 42, 1.3


def bucking(turn):
    """The loose pipe bucks with a short rising groan, locked to every stroke or to every few."""
    out = np.zeros(N)
    for first, last, strokes, hz, db in BUCKING:
        start, end = np.interp([first, last], T, turn)
        spacing = np.round(2 * strokes) / 2
        times = np.interp(np.arange(start, end, spacing), turn, T)
        for at, (late, pitch, size) in zip(times, rng.standard_normal((40, 3))):
            near = slice(int((at - .02) * SR), int((at + .02) * SR))
            age = T[near] - at - .0004 * late
            groan = burst(age, hz * (1 + .05 * pitch), BUCK_S, BUCK_GLIDE_PER_S)
            out[near] += undb(db + BUCK_SCATTER_DB * size) * groan
    return out


# The nearly severed wall chirps. Each row: time in seconds, level in dB before a gain of 1.2, pitch in Hz.
CHIRPS = [(6.527, -14, 2100), (6.778, -13, 2130), (6.799, -12, 2120), (6.911, -13, 2150),
          (6.922, -13, 2110), (6.931, -14, 2150), (6.963, -13.5, 2360), (6.993, -16, 2150),
          (7.023, -13.5, 2250), (7.103, -15.5, 2300), (7.286, -17, 2130), (7.306, -13.5, 2130),
          (7.408, -11.5, 2197), (7.542, -13.5, 2160), (7.785, -14, 2150), (7.932, -15.5, 2200)]


def chirps():
    """The nearly severed wall chirps against the blade: a few cycles of a steady high tone."""
    return sum(1.2 * undb(level) * burst(T - at, hz, 0.0014) for at, level, hz in CHIRPS)


def scene():
    """Digging, then sawing, in still outdoor air."""
    digging = spade() + stones()
    sawing = handling() + saw() + snags() + chips() + chirps()
    return (still_air() + digging + sawing)[None]


TOP_HZ = 15740


def record(dry):
    """The microphone rounds the highest peaks; the top is cut."""
    ceiling = 0.59
    rounded = ceiling * np.tanh(dry / ceiling)
    return signal.sosfilt(signal.ellip(10, .2, 80, TOP_HZ, fs=SR, output="sos"), rounded)


dry = scene()
out = record(dry)
transcribe(out)
```